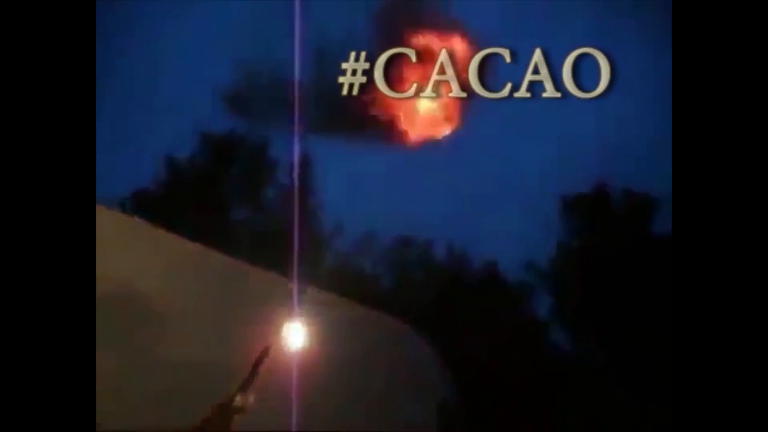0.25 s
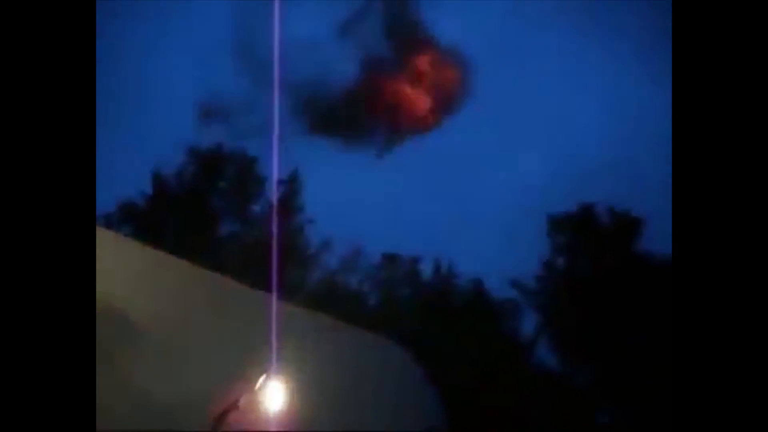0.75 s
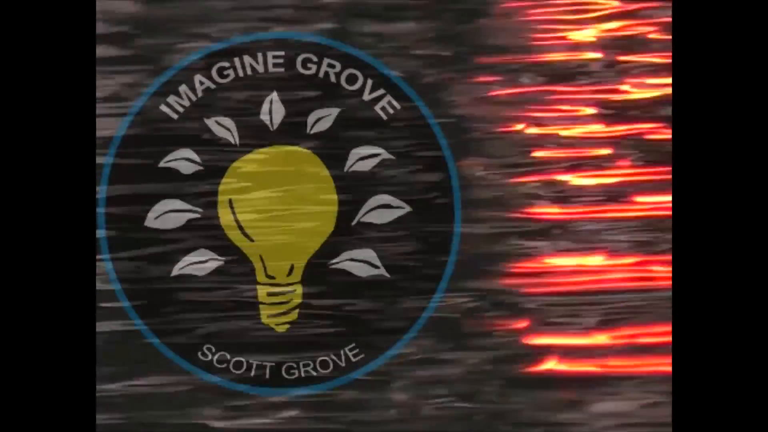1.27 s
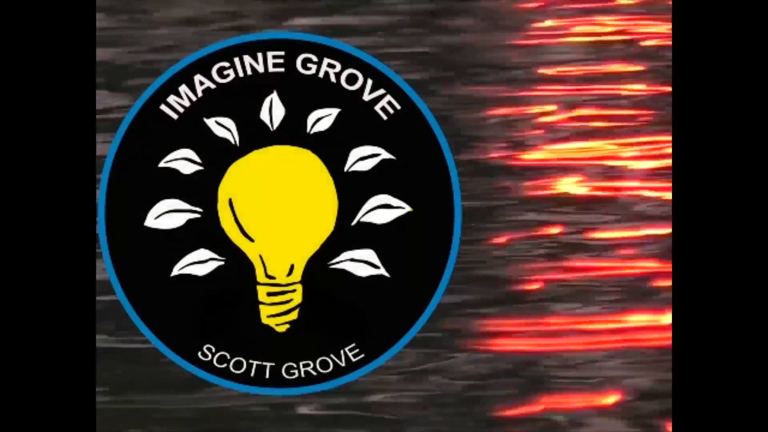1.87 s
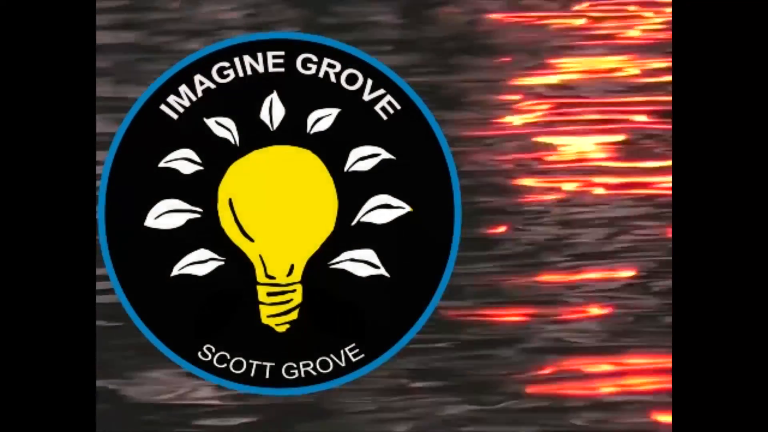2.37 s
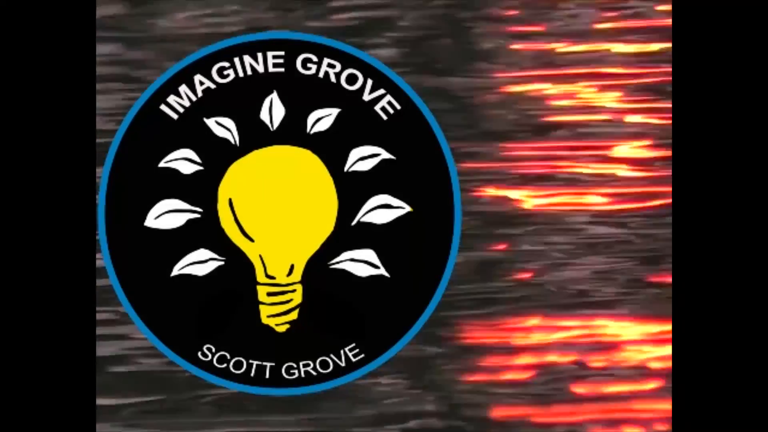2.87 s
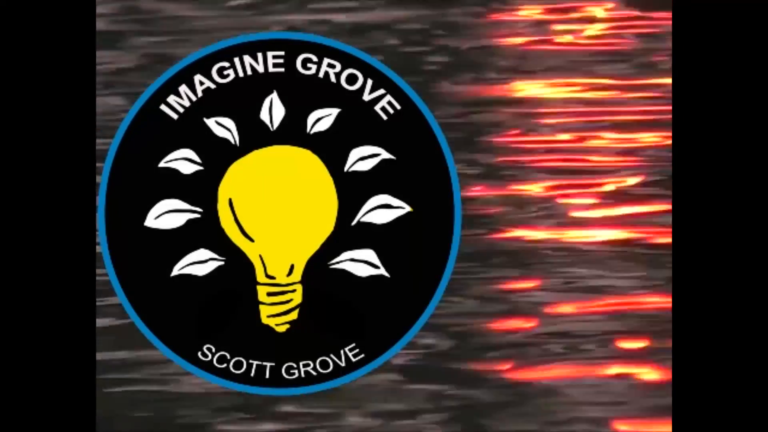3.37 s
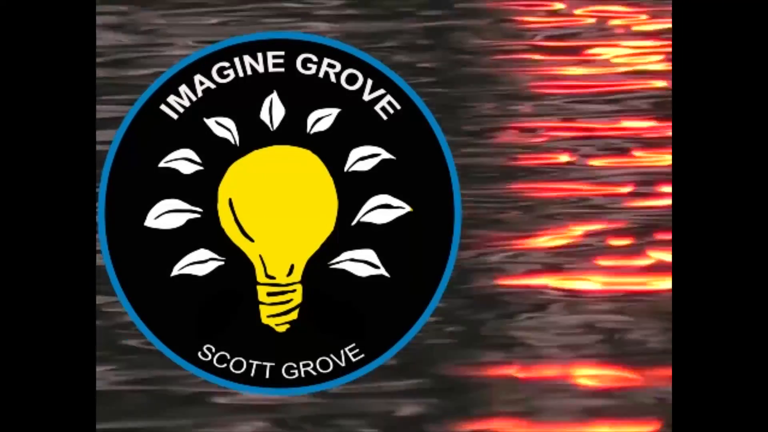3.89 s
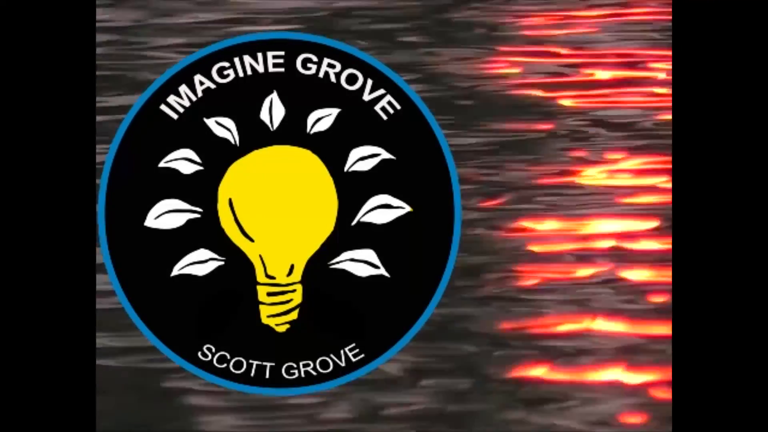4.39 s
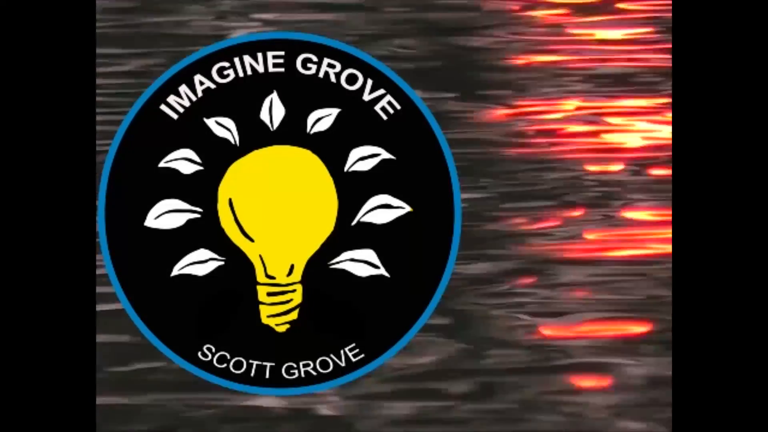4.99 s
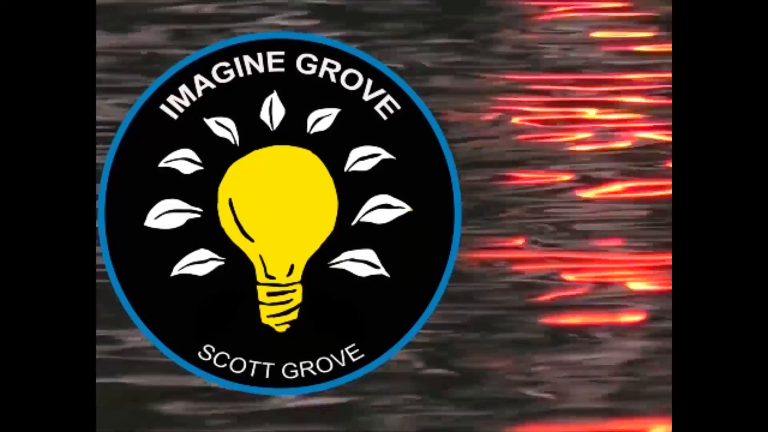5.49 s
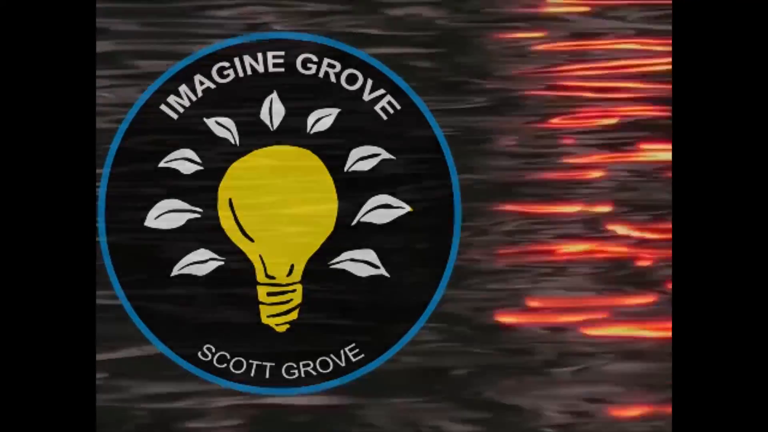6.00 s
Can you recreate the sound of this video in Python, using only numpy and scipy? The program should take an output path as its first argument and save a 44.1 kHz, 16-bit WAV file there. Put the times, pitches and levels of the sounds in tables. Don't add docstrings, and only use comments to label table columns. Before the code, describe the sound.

A gas fireball roars at full level from the first instant, harsh and crackling, overloaded through a cheap narrow-band microphone, with low thumps and a thin jet whistle. Just before one second it cuts hard to a far quieter outdoor waterside: ripple and leaf hiss, low wind rumble, faint crickets and very high katydid ticking. A few soft wind buffets bump the microphone after four seconds.

```python
import sys
import numpy as np
from scipy import signal
from scipy.fft import irfft
from scipy.io import wavfile
from scipy.ndimage import uniform_filter1d

SR = 44100
rng = np.random.default_rng(int(sys.argv[2]) if len(sys.argv) > 2 else 0)


def how_loud(loudness_db):
    steps = np.asarray(loudness_db, float) / 20
    return 10 ** steps


def wav_out(sig):
    wavfile.write(sys.argv[1], SR, np.round(np.clip(np.atleast_2d(sig).T, -1, 1) * 32767).astype(np.int16))


N = 275580
LOW_SR = 7875
GAP_START_S, GAP_END_S, CUT_S = .2616, .2629, .8963
# centre_s, peak_db, centre_hz
CRACK_EVENTS = [(0.0161, 1.5, 1060), (0.0297, -3, 1260), (0.0471, -3, 1770), (0.077, 0.5, 1240),
                (0.089, 0, 1505), (0.1301, 2.5, 1310), (0.1445, 0.5, 1390), (0.1543, -2, 1836),
                (0.22, -1.3, 1130), (0.2352, -2, 1380), (0.2432, -2.5, 1450), (0.3335, -6, 1150),
                (0.363, -4, 1240), (0.3836, -2, 1680), (0.4816, -5, 1890), (0.505, -5.5, 1830),
                (0.5252, -6, 1700), (0.537, -7, 1420), (0.5464, -5, 1442), (0.6086, -0.5, 1720),
                (0.6164, 2.5, 1410), (0.7274, -9, 1410), (0.7548, 1, 950), (0.7682, 0.5, 1750),
                (0.7771, -4, 1220), (0.8096, -3.5, 1125), (0.862, 4.7, 1534), (0.8783, -6.5, 1664),
                (0.8839, -4, 1630), (0.8949, -3, 1526)]
# time_s, level_db
BREEZE_CURVE = [(0.92, -56), (1.71, -55.5), (2.83, -54), (2.99, -52), (4.11, -52.5), (4.57, -51.5),
                (6.05, -55), (6.24, -54.5)]


def evened(x):
    return x / np.sqrt(np.mean(x ** 2) + 1e-20)


def read(points, hz):
    f, db = np.transpose(points)
    return np.interp(np.log(hz + 1), np.log(f + 1), db, left=-90, right=-90)


def curve(points, t):
    s, db = np.transpose(points)
    return np.interp(t, s, db)


def smooth(n, size):
    once = uniform_filter1d(rng.standard_normal(n), size)
    return evened(uniform_filter1d(once, size))


def swells(rows, t, base_db):
    return how_loud(base_db) + sum(how_loud(db) * np.exp(-((t - s) / half) ** 2) for s, db, half in rows)


def turbulence(colour, n, sr, size, patchy_db, flicker_db, drift_db=0):
    frames, hz = 4 * n // size + 5, np.fft.rfftfreq(size, 1 / sr)
    a, b, patches, bands = rng.standard_normal((frames, len(hz), 4)).T
    patches = evened(uniform_filter1d(uniform_filter1d(patches, size=7, axis=0), size=9, axis=1))
    bands = evened(uniform_filter1d(uniform_filter1d(bands, size=20, axis=0), size=45, axis=1))
    field_db = read(colour, hz)[:, None] + patchy_db * patches + drift_db * bands
    field_db += flicker_db * smooth(frames, size=2)
    spectrum = (a + 1j * b) * how_loud(field_db)
    return evened(signal.istft(spectrum, nperseg=size, noverlap=3 * size // 4)[1][:n])


def whistle(n, sr, hz, width_hz):
    r = np.exp(-np.pi * width_hz / sr)
    poles = [1, -2 * r * np.cos(2 * np.pi * hz / sr), r * r]
    return evened(signal.lfilter([1], poles, rng.standard_normal(n)))


def wavelet(u, hz, cycles, turn=0.49):
    return np.cos(2 * np.pi * (hz * u + turn)) * np.exp(-(u * hz / cycles) ** 2)


def masked(x, reach_hz, margin_db):
    hz, t, z = signal.stft(x, SR, nperseg=2048, noverlap=1536)
    power = uniform_filter1d(abs(z) ** 2, size=3, axis=1)
    band = uniform_filter1d(power, size=5, axis=0)
    around = uniform_filter1d(power, size=int(2 * reach_hz / hz[1]), axis=0)
    over_db = 10 * np.log10((abs(band) + 1e-20) / (abs(around) + 1e-20)) + margin_db(t)
    kept = np.clip(over_db / 3 + .5, 0, 1)
    return signal.istft(z * kept, SR, nperseg=2048, noverlap=1536)[1][:len(x)]


def wind(t):
    # freq_hz, level_db
    gust_colour = [(15, -22), (35, -10.5), (65, -4.5), (90, 0), (130, -3.5), (200, -17)]
    rumble_colour = [(60, -37), (110, -6.5), (160, -0.5), (200, 2.5), (270, -3.5), (330, -9), (400, -22),
                     (480, -30)]
    # time_s, peak_db, half_length_s
    gust_events = [(1.72, -58, .05), (2.5, -62, .15), (3.4, -57, .08), (3.58, -55, .05), (3.83, -58, .04),
                   (4.0, -54, .025), (4.27, -44, .025), (4.28, -42.5, .12), (4.58, -50, 0.045),
                   (5.33, -59, 0.037), (6.24, -54, .04)]
    # time_s, peak_db, half_length_s
    rumble_swells = [(1.12, -54, 0.029), (1.47, -56, 0.023), (2.0, -55, 0.04), (2.46, -54, 0.063),
                     (3.2, -58, 0.17), (3.85, -52, 0.057), (4.19, -51, 0.027), (4.38, -49.5, 0.055),
                     (4.55, -49, 0.02), (5.69, -51, .07), (5.88, -52, .05)]
    # time_s, peak_db, pitch_hz
    buffet_events = [(3.58, -58, 70), (3.83, -53, 60), (4.18, -41, 74.6), (4.225, -46, 100),
                     (4.27, -29.5, 86), (4.313, -37, 131), (4.365, -31, 175), (4.436, -32.5, 214),
                     (4.584, -46, 69.5)]
    gusts = turbulence(gust_colour, N, SR, size=2048, patchy_db=1.2, flicker_db=1.0)
    rumble = turbulence(rumble_colour, N, SR, size=2048, patchy_db=0.44, flicker_db=-1.06)
    out = swells(gust_events, t, base_db=-61) * gusts
    out += swells(rumble_swells, t, base_db=-46) * rumble
    return out + sum(how_loud(db) * wavelet(t - s, hz, 1.37) for s, db, hz in buffet_events)


def ripples(t):
    # freq_hz, level_db
    ripple_colour = [(350, -22), (500, -7), (680, -2), (850, -9), (1000, 0.5), (1400, 0), (1950, -1),
                     (2500, 0), (3100, -4.5), (3800, -5.5), (5200, -3), (5700, -9), (7000, -30.5)]
    level_db = -52 + 0.33 * (curve(BREEZE_CURVE, t) + 54.5)
    return how_loud(level_db) * turbulence(ripple_colour, N, SR, size=2048, patchy_db=1.9, flicker_db=.9, drift_db=1.1)


def leaves(t):
    # freq_hz, level_db
    leaf_colour = [(4500, -12), (6000, -3.5), (7000, -3.5), (8500, 0), (10200, 2), (12000, -2.5),
                   (14000, -6), (16000, -9.5)]
    rustle = turbulence(leaf_colour, N, SR, size=512, patchy_db=1.15, flicker_db=0.25)
    return how_loud(curve(BREEZE_CURVE, t) + 0.68) * rustle


def crickets(t):
    # time_s, peak_db
    chirp_events = [(.9, -66), (1.48, -63), (2.2, -62), (2.45, -71), (3.2, -65), (3.34, -59), (3.86, -64),
                    (4.13, -67), (4.54, -64), (5.03, -61), (5.42, -64), (6.01, -65)]
    chorus = swells([(s, db, .07) for s, db in chirp_events], t, base_db=-68)
    return chorus * how_loud(0.83 * smooth(N, size=900)) * whistle(N, SR, hz=3542, width_hz=105)


def katydid():
    # start_s, tick_count, first_gap_s, start_level_db
    phrases = [
        (.915, 6, .0261, -39),
        (2.7265, 77, .02468, -39.5),
    ]
    tiring_s, growth_db = 7.7e-6, .045
    strokes, u = np.zeros(N), np.arange(120) / SR
    for start, ticks, gap, db in phrases:
        k = np.arange(ticks)
        at_s = start + gap * k + tiring_s * k ** 2
        strokes[(at_s * SR).astype(int)] = how_loud(db + growth_db * k + 1.5 * rng.standard_normal(ticks))
    tick = np.sin(2 * np.pi * 15400 * u) + .6 * np.sin(2 * np.pi * 13700 * u)
    tick *= np.exp(-u / .0004) * np.minimum(u / .00015, 1)
    return signal.oaconvolve(strokes, tick)[:N]


def lakeside():
    t = np.arange(N) / SR
    out = wind(t) + ripples(t) + leaves(t) + crickets(t) + katydid()
    return masked(out, reach_hz=430, margin_db=lambda s: 23) * (t > CUT_S)


def thump(t):
    # freq_hz, level_db
    thump_colour = [(15, 0.5), (40, -6), (100, -0.5), (200, -1), (350, -8), (550, -8)]
    # time_s, peak_db, half_length_s
    surge_events = [(.29, -24, .045), (.40, -31, 0.047), (.53, -32.5, .04), (.77, -27, 0.031),
                    (.89, -31, .015)]
    level = swells(surge_events, t, base_db=-29) * np.minimum(t / 0.034, 1)
    return level * turbulence(thump_colour, LOW_SR, LOW_SR, size=512, patchy_db=2.0, flicker_db=1.0)


def jet(t):
    # time_s, peak_db, half_length_s
    flare_events = [(.15, -23.5, .03), (.322, -19.5, 0.011), (.388, -15.5, 0.012), (.42, -24.5, 0.01),
                    (.5, -22.5, 0.04), (.81, -29, 0.044), (.89, -24.5, .02)]
    level = swells(flare_events, t, base_db=-25) * np.minimum(t / 0.24, 1)
    return level * whistle(LOW_SR, LOW_SR, hz=1950, width_hz=160)


def crackle(t, per_s, spread_db):
    size = how_loud(spread_db * np.minimum(rng.exponential(1, len(t)), 4))
    size *= rng.random(len(t)) < per_s / LOW_SR
    kind, u = rng.integers(0, 6, len(t)), t[:40] - t[20]
    pitches_hz = np.geomspace(700, 2000, num=6)
    return evened(sum(np.convolve(size * (kind == k), wavelet(u, hz, 0.54), "same")
                      for k, hz in enumerate(pitches_hz)))


def flame(t):
    # time_s, level_db
    flame_curve = [(0, -15.5), (.19, -16), (.245, -12), (.28, -25), (.335, -15.5), (.39, -13), (.7, -15.5),
                   (.775, -15), (.885, -16)]
    # freq_hz, level_db
    roar_colour = [(150, -17.5), (400, -2), (700, -4.5), (1100, 0.5), (1600, 0.5), (2000, 0), (2400, -3.5),
                   (2800, -10), (3300, -29)]
    sizzle_colour = [(1900, -15.5), (2400, -0.5), (2700, 6), (3100, 2), (4000, -10.5)]
    flame_db = curve(flame_curve, t)
    burn = how_loud(1.3 * smooth(LOW_SR, size=12) + 1.1 * smooth(LOW_SR, size=70))
    burn *= 1 + sum(how_loud(db + 2.0) * np.exp(-((t - s) / 0.0018) ** 2) for s, db, _ in CRACK_EVENTS)
    roar = turbulence(roar_colour, LOW_SR, LOW_SR, size=128, patchy_db=1.0, flicker_db=-0.1)
    sizzle = turbulence(sizzle_colour, LOW_SR, LOW_SR, size=128, patchy_db=1.0, flicker_db=0.3)
    out = how_loud(flame_db - 1.5) * evened(burn * roar)
    out += how_loud(flame_db - 5.5) * crackle(t, per_s=500, spread_db=3.0)
    return out + how_loud(-27 + 0.76 * (flame_db + 14.5)) * evened(burn ** 0.87 * sizzle)


def cracks(t):
    turns = rng.uniform(.2, .9, len(CRACK_EVENTS))
    return sum(how_loud(db - 5) * wavelet(t - s, hz, 0.48, turn)
               for (s, db, hz), turn in zip(CRACK_EVENTS, turns))


def fireball():
    t = np.arange(LOW_SR) / LOW_SR
    fire = flame(t) + thump(t) + jet(t)
    repeat_s, repeat = .01395, 0.45
    fire = (fire + repeat * np.interp(t - repeat_s, t, fire, left=0)) / np.sqrt(1 + repeat ** 2)
    fire = fire + cracks(t)
    overload = .95
    return fire / (1 + (fire / overload) ** 4) ** .25


def fire_margin_db(t):
    after = 12 + 11 * np.exp(-((t - GAP_START_S) / .22) ** 2)
    return np.where(t < GAP_START_S, 9.3, after)


def upsampled(low):
    # freq_hz, gain_db
    converter_gain = [(2900, -1.5), (3400, -3.5), (3700, -7), (3850, -20), (3935, -39.5), (4600, -50)]
    # freq_hz, gain_db
    mirror_gain = [(3935, 3.5), (4500, -2.5), (5000, -4), (5330, -4.5), (5400, -30.5), (5480, -53),
                   (5600, -89.5)]
    hz = np.arange(float(LOW_SR))
    folded_hz = np.minimum(hz, LOW_SR - hz)
    gain_db = curve(converter_gain, folded_hz) + np.where(hz > LOW_SR / 2, read(mirror_gain, hz), 0)
    wide = irfft(np.fft.fft(low) * how_loud(gain_db), SR) * SR / LOW_SR
    wide = masked(wide, reach_hz=890, margin_db=fire_margin_db)
    t = np.arange(SR) / SR
    playing = np.clip(np.maximum(GAP_START_S - t, t - GAP_END_S) / .00005, 0, 1)
    playing *= np.clip(.1 + t / .002, 0, 1)
    playing *= np.clip((CUT_S - t) / 0.00094, 0, 1)
    return np.pad(wide * playing, (0, N - SR))


def scene():
    return (upsampled(fireball()) + lakeside())[None]


def roll_off(x):
    return signal.sosfilt(signal.butter(12, 15960, fs=SR, output="sos"), x)


def record(dry):
    edge = signal.firwin(1023, 15700, window=("kaiser", 9), fs=SR)
    mix = signal.oaconvolve(dry, edge[None], "same")
    return roll_off(mix)


dry = scene()
out = record(dry)
wav_out(out)
```